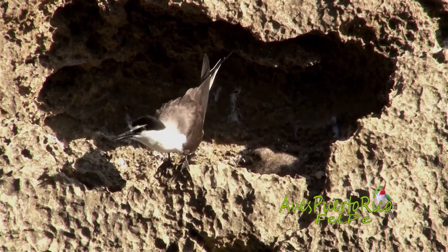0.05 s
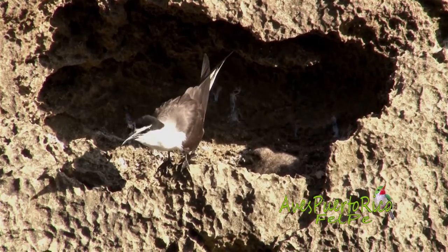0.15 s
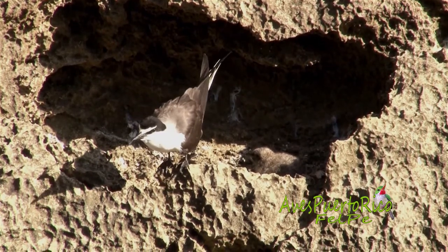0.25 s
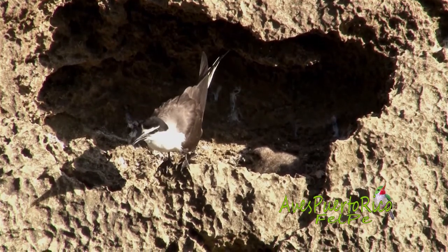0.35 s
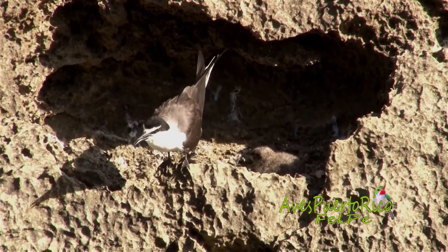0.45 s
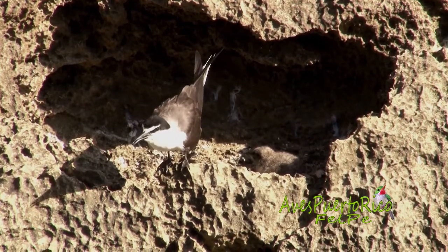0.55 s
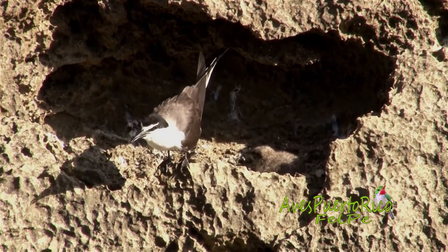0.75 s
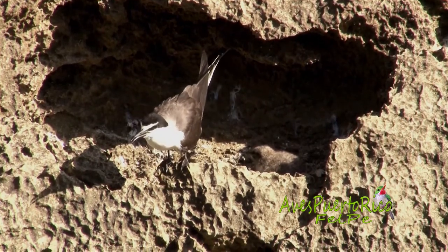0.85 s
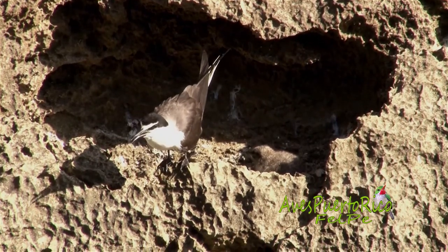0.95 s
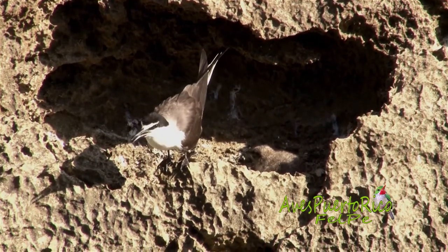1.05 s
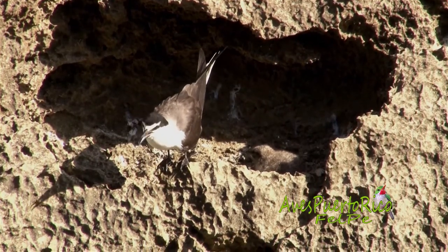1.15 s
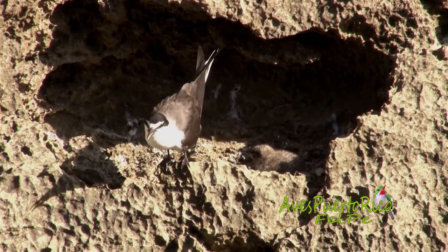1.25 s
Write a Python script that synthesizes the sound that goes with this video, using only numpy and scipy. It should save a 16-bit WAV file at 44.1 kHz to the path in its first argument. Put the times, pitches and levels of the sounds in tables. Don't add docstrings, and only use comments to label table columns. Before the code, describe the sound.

Two brief seabird yelps, the second weaker, echo off rock amid surf wash and wind buffeting

```python
import sys
import numpy as np
from scipy import signal
from scipy.io import wavfile
from scipy.ndimage import uniform_filter1d

SR = 44100
rng = np.random.default_rng(int(sys.argv[2]) if len(sys.argv) > 2 else 0)


def voltage_ratio(level):
    return 10 ** (np.asarray(level, float) / 20)


def transcribe(u):
    v = np.clip(np.atleast_2d(u).T, -1, 1)
    q = np.round(v * 32767).astype(np.int16)
    wavfile.write(sys.argv[1], SR, q)


N = 57330


def evened(x):
    return x / np.sqrt(np.mean(x ** 2) + 1e-20)


def read(points, hz):
    f, value = np.transpose(points)
    return np.interp(np.log(hz + 1), np.log(f + 1), value)


def slow(size, span):
    return evened(uniform_filter1d(uniform_filter1d(rng.standard_normal(size), span), span))


def noise_pair(colour, same, patch_db, size):
    hop = size // 4
    hz = np.fft.rfftfreq(size, 1 / SR)
    a, b, c, d, patches = rng.standard_normal((N // hop + 5, len(hz), 5)).T
    patches = uniform_filter1d(uniform_filter1d(patches, size=8, axis=0), size=8, axis=1)
    same = np.clip(same(hz), -1, 1)[:, None]
    left = a + 1j * b
    right = same * left + np.sqrt(1 - same ** 2) * (c + 1j * d)
    z = np.array([left, right]) * voltage_ratio(read(colour, hz)[:, None] + patch_db * evened(patches))
    return evened(signal.istft(z, nperseg=size, noverlap=size - hop)[1][:, :N])


# time in seconds, pitch in Hz, effort in dB.
FIRST_ARCH = [
    (.198, 531.1, -57),
    (.211, 583.7, -36.5),
    (.226, 656.6, -32.5),
    (.236, 692, -32.5),
    (.247, 685.8, -30.5),
    (.259, 683.4, -30),
    (.268, 592.5, -34.5),
    (.276, 545.2, -37.5),
    (.294, 548, -50),
]
SECOND_ARCH = [
    (.692, 538.4, -48),
    (.702, 556, -51.5),
    (.712, 606.4, -43),
    (.728, 653.4, -36),
    (.74, 646.3, -34),
    (.749, 649.5, -37.5),
    (.758, 596, -39.5),
    (.764, 557, -46),
    (.775, 505, -47.5),
]
# frequency in Hz, level in dB.
FIRST_THROAT = [(650, -34.5), (1380, -3.5), (1800, 0), (2070, 1.5), (2750, -12.5), (4200, -24), (5400, -35),
                (12000, -59.5)]
SECOND_THROAT = [(620, -23), (1300, 1), (1700, 10), (1950, 2.5), (3250, -12.5), (4650, -25.5), (5400, -40),
                 (12000, -52.5)]
# frequency in Hz, width in Hz, level in dB.
FIRST_SHEEN = [(7380, 370, -34), (11260, 500, -45)]
SECOND_SHEEN = [(6200, 440, -38), (11550, 350, -33)]
JITTER, BREATH_DB, FLUTTER_DB = .004, -23, 3.5
CENTRE_HZ, NARROWING = 1750, .9


def yelp(arch, throat, sheen):
    t = np.arange(N) / SR
    s, pitch_hz, effort_db = np.transpose(arch)
    hz = uniform_filter1d(np.interp(t, s, pitch_hz), size=150) * (1 + JITTER * slow(N, 90))
    effort = uniform_filter1d(np.interp(t, s, effort_db), size=150)
    weak = effort_db.max() - effort
    turns = np.cumsum(hz) / SR
    out = np.zeros(N)
    for k in range(1, 20):
        high = sum(voltage_ratio(db - 6 * ((k * hz - f) / w) ** 2) for f, w, db in sheen)
        breath = 1 + voltage_ratio(BREATH_DB) * min(k, 5) * slow(N, 40)
        unsteady = np.minimum(.15 + weak / 7 + .5 * max(k - 3, 0), 1.6)
        flutter = voltage_ratio(FLUTTER_DB * unsteady * slow(N, 170))
        thin = voltage_ratio(-NARROWING * weak * abs(np.log2(k * hz / CENTRE_HZ)))
        tone = np.sin(2 * np.pi * k * turns + .3 * k * k)
        out += (voltage_ratio(read(throat, k * hz)) + high) * breath * flutter * thin * tone
    fade = np.clip(np.minimum(t - s[0], s[-1] - t) / 0.0027, 0, 1)
    return out * fade * voltage_ratio(effort)


# delay in seconds, left level in dB, right level in dB.
ROCK_FACES = [
    (.016, -15, -16),
    (.022, -15, -14),
    (.037, -20, -21),
    (.052, -22, -22),
]
HOLLOW_DB, HOLLOW_T60, CLIFF_DB, CLIFF_T60 = -14, .16, -21, 1.0
TAIL_SAME, TAIL_DULL_HZ = .8, 1900


def hollow(x):
    t = np.arange(SR) / SR
    out = np.zeros((2, SR))
    a, b, c, d = rng.standard_normal((4, SR)) * np.clip((t - .004) / 0.0033, 0, 1)
    for left, other, db, t60 in ((a, b, HOLLOW_DB, HOLLOW_T60), (c, d, CLIFF_DB, CLIFF_T60)):
        right = TAIL_SAME * left + np.sqrt(1 - TAIL_SAME ** 2) * other
        tail = np.array([left, right]) * voltage_ratio(-60 * t / t60)
        out += voltage_ratio(db) * tail / np.linalg.norm(tail[0])
    keep = np.exp(-2 * np.pi * TAIL_DULL_HZ / SR)
    out = 2 * signal.lfilter([1 - keep], [1, -keep], out)
    for delay, left_db, right_db in ROCK_FACES:
        out[:, round(delay * SR)] += voltage_ratio(np.array([left_db, right_db]))
    return signal.fftconvolve(x[None], out, axes=1)[:, :N]


# start in seconds, length in seconds, level in dB.
GUST_HITS = [
    (0.056, .035, -62.5),
    (0.381, .055, -52),
    (0.437, .075, -54.5),
    (0.597, .025, -54),
    (0.658, .05, -52.5),
    (0.698, .065, -50),
    (.885, .03, -65.5),
    (1.146, 0.063, -54.5),
    (1.202, 0.069, -51.5),
]
# frequency in Hz, density in dB per Hz.
GUST_TONE = [(100, -23), (430, -21.5), (600, -10), (780, 9.5), (1100, -10), (1800, -20.5), (4600, -36),
             (5000, -58.5)]
GUST_RISE_S, GUST_FALL_S, PORTS_SAME = 0.0066, 0.01, -0.73
LUMP_DB, GUST_PAN_DB = 2.5, 4


def gusts():
    t = np.arange(N) / SR
    level = np.zeros(N)
    for s, length, db in GUST_HITS:
        rise = (t - s) / GUST_RISE_S
        fall = (s + length - t) / GUST_FALL_S + .5
        level += voltage_ratio(db) * np.clip(np.minimum(rise, fall), 0, 1)
    lumps = voltage_ratio(LUMP_DB * slow(N, 150) + GUST_PAN_DB * np.array([[.5], [-.5]]))
    return noise_pair(GUST_TONE, lambda hz: PORTS_SAME + 0 * hz, 0.73, size=512) * level * lumps


# time in seconds, level in dB.
RUMBLE_SWINGS = [(0.0, -75), (0.032, -64), (0.184, -75), (0.354, -75), (0.434, -57.5), (0.596, -69),
                 (0.632, -63), (0.792, -76.5), (1.012, -76), (1.046, -61), (1.11, -77.5), (1.18, -55),
                 (1.208, -70.5), (1.3, -72)]
# frequency in Hz, density in dB per Hz.
DEEP_TONE = [(10, -4), (30, 4), (55, -9.5), (85, -25.5), (130, -21.5), (200, -42.5), (450, -33), (700, -73)]
# frequency in Hz, density in dB per Hz.
MURMUR_TONE = [(60, -11.5), (150, -3), (430, 2.5), (600, -29)]
RUMBLE_DB, MURMUR_DB, RUMBLE_SAME = 7.5, -90.5, -0.59


def rumble():
    s, db = np.transpose(RUMBLE_SWINGS)
    swing = voltage_ratio(RUMBLE_DB + np.interp(np.arange(N) / SR, s, db))
    deep = noise_pair(DEEP_TONE, lambda hz: RUMBLE_SAME + 0 * hz, 0.87, size=2048) * swing
    return deep + voltage_ratio(MURMUR_DB) * noise_pair(MURMUR_TONE, lambda hz: RUMBLE_SAME + 0 * hz, 1, size=2048)


# frequency in Hz, density in dB per Hz.
SURF_TONE = [(400, -14), (560, -12), (900, 3), (2100, -1), (4550, -13.5), (8000, -26.5), (10800, -35),
             (11500, -39)]
# time in seconds, level in dB.
SURF_SWELL = [(0, -1.5), (.05, 2.5), (.12, 1), (.19, 4.5), (.4, 8.5), (.6, 6.4), (.9, 6.8), (1.1, 5),
              (1.3, 5.8)]
# frequency in Hz, left-right likeness from -1 to 1.
SURF_SAME = [(500, .3), (900, 0.79), (1300, 0.63), (2300, 0.61), (4300, 0.83), (8000, .8), (12000, .9)]
SURF_DB, PATCH_DB = -58.5, 1.2


def surf():
    s, db = np.transpose(SURF_SWELL)
    swell = voltage_ratio(SURF_DB + np.interp(np.arange(N) / SR, s, db))
    return noise_pair(SURF_TONE, lambda hz: read(SURF_SAME, hz), PATCH_DB, size=1024) * swell


# start in seconds, length in seconds, first pitch in Hz, last pitch in Hz, level in dB.
WHISTLES = [
    (1.13, .1, 4300, 4380, -62),
    (1.195, .045, 3950, 3680, -61),
    (1.125, .05, 4620, 4650, -66),
    (1.11, .07, 3820, 3880, -66),
    (1.165, .03, 3120, 3080, -64),
    (1.22, .03, 3040, 2960, -64),
    (.945, .045, 1040, 1020, -55),
]


def far_birds():
    t = np.arange(N) / SR
    out = np.zeros(N)
    for s, length, first_hz, last_hz, db in WHISTLES:
        u = np.clip((t - s) / length, 0, 1)
        hz = (first_hz + (last_hz - first_hz) * u ** 2) * (1 + .012 * slow(N, 120))
        swell = np.sin(np.pi * u ** 1.4)
        blur = .5 + .7 * slow(N, 130)
        out += voltage_ratio(db) * swell * np.sin(2 * np.pi * np.cumsum(hz) / SR) * blur
    return out * voltage_ratio(np.array([[3.], [-4.]]))


# frequency in Hz, width in Hz, level in dB.
NOOK_MODES = [(886, 52, -12), (953, 52, 6), (1065, 22, -19), (1352.6, 16, -10.5), (1460.5, 15, 10),
              (1529, 50, -14.5), (1781, 12, -17), (1906, 19, -17), (2056, 45.6, 4), (2220, 85, -9.5),
              (2533, 31, -7.5), (3377, 24, -15.5), (2760, 29, -3), (4450, 12, -11)]
LOW_EDGE_HZ, LOW_CUT_DB, HIGH_EDGE_HZ, HIGH_CUT_DB = 471, -42, 4734, -16
RIPPLE_DB, RIPPLE_FROM_HZ = 4, 4500


def nook(x):
    hz = abs(np.fft.fftfreq(8192, 1 / SR))
    low_db = LOW_CUT_DB / (1 + (hz / LOW_EDGE_HZ) ** 12)
    high_db = HIGH_CUT_DB / (1 + (HIGH_EDGE_HZ / (hz + 1)) ** 40)
    ripple = slow(8192, 9)
    ripple = (ripple + np.roll(ripple[::-1], 1)) / np.sqrt(2)
    ripple_db = RIPPLE_DB * ripple / (1 + (RIPPLE_FROM_HZ / (hz + 1)) ** 8)
    modes_db = sum(db / (1 + ((hz - f) / w) ** 2) for f, w, db in NOOK_MODES)
    log_gain = np.log(voltage_ratio(low_db + high_db + ripple_db + modes_db))
    taps = np.fft.ifft(np.exp(np.conj(signal.hilbert(log_gain)))).real[:4096]
    return signal.fftconvolve(x, taps[None], axes=1)[:, :N]


FIRST_PAN_DB, SECOND_PAN_DB, ECHO_PAN_DB = 3, 2.5, 1.5
EARLIER_S, EARLIER_DB = 0.31, -1.5
TURN_HZ = 9
SCATTER = .85


def scene():
    first = yelp(FIRST_ARCH, FIRST_THROAT, FIRST_SHEEN)
    second = yelp(SECOND_ARCH, SECOND_THROAT, SECOND_SHEEN)
    side = np.array([[.5], [-.5]])
    bird = first * voltage_ratio(side * FIRST_PAN_DB) + second * voltage_ratio(side * SECOND_PAN_DB)
    skip = round(EARLIER_S * SR)
    earlier = voltage_ratio(EARLIER_DB) * np.pad(hollow(first)[:, skip:], ((0, 0), (0, skip)))
    turn = 2 * np.pi * TURN_HZ * np.arange(N) / SR
    calls = first + second
    echoes = hollow(calls * np.cos(turn)) + hollow(calls * np.sin(turn)) + earlier
    echoes = echoes * (np.sqrt(1 - SCATTER ** 2) + SCATTER * slow(N, 70))
    airborne = bird + echoes * voltage_ratio(side * ECHO_PAN_DB) + surf() + far_birds()
    return nook(airborne) + gusts() + rumble()


def top_cut(x):
    return signal.sosfilt(signal.butter(12, 12000, fs=SR, output="sos"), x)


HISS_DB = -116


def record(dry):
    hiss = voltage_ratio(HISS_DB) * rng.standard_normal(dry.shape)
    return top_cut(dry + hiss)


dry = scene()
out = record(dry)
transcribe(out)
```